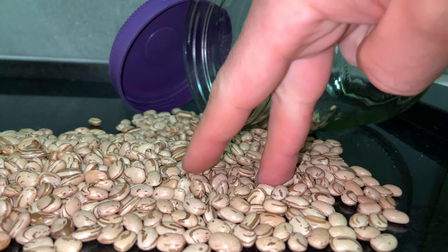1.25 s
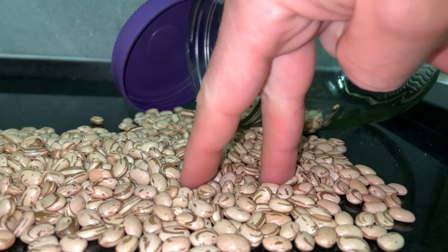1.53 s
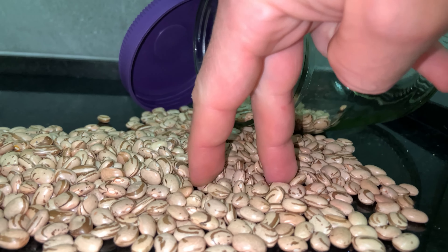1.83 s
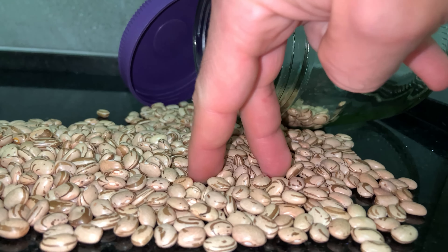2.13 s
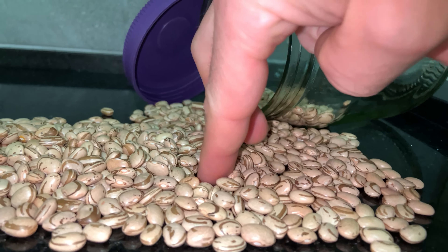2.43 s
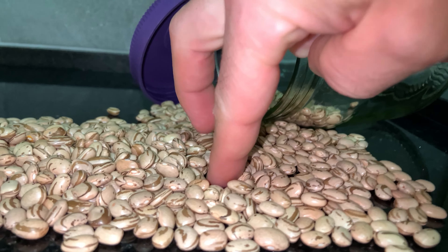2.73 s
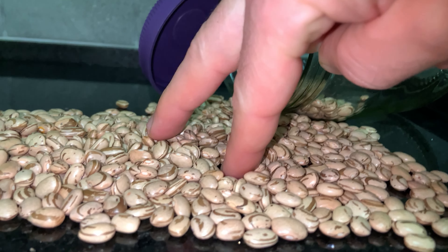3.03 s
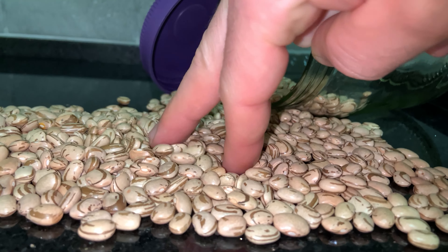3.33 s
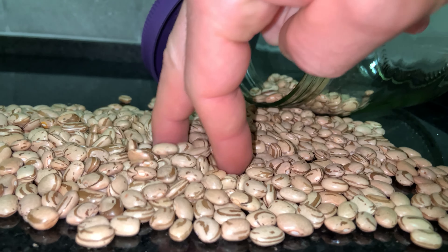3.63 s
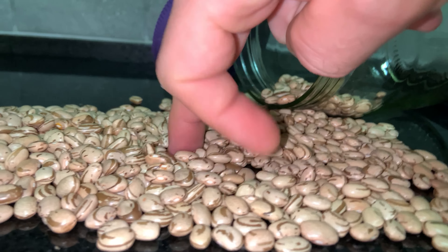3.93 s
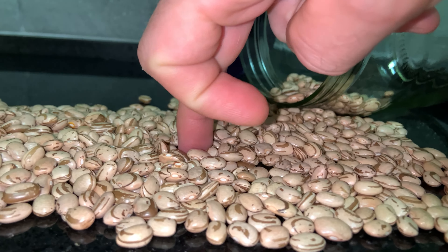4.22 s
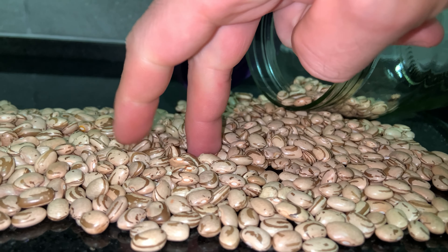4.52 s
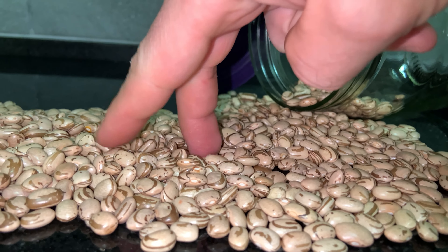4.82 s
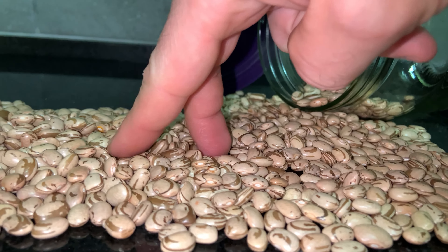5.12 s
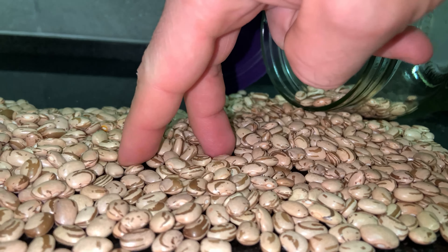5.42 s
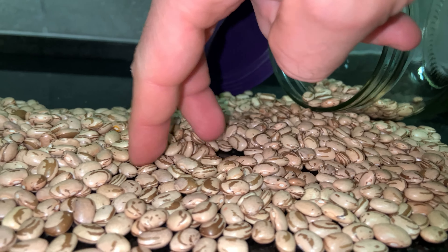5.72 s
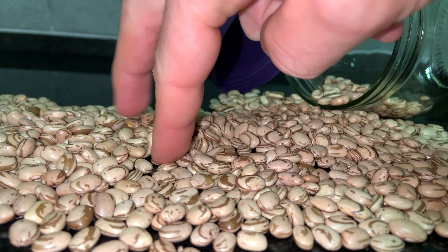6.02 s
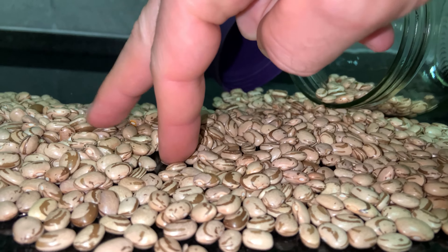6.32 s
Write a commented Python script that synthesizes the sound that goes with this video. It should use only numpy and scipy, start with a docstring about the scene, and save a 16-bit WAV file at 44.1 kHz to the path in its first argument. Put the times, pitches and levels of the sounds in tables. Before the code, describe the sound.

In a small room, an appliance hums quietly with a faint high whine. Close to a stereo microphone, dry beans click and shift as fingers press into a pile on a table. The crisp little bursts come with pauses between them and grow stronger, until a short rattling spill of beans makes the loudest moment. A few more ticks follow as the pile settles, each with a slight room echo.

```python
"""Dry beans tick and rustle as two fingers walk slowly through a heap of them on a hard table.
Their shells snap against each other, slide in small slips, and once tumble down the front of the heap.
They are close to a stereo microphone, and the small room adds a short echo.
Behind them an appliance hums and faintly whines over a low rumble and a soft hiss.
Faint hissy whistles and a few soft, low bumps come and go."""
import sys
import numpy as np
from scipy import signal
from scipy.fft import rfft, irfft
from scipy.io import wavfile
from scipy.ndimage import uniform_filter1d

SR = 44100
rng = np.random.default_rng(int(sys.argv[2]) if len(sys.argv) > 2 else 0)


def output_pcm(signal):
    """Save a mono or channel-first signal as 16-bit PCM at the path in sys.argv[1].

    Samples are clipped to [-1, 1] before scaling.
    """
    pcm = np.clip(np.atleast_2d(signal).T, -1, 1) * 32767
    wavfile.write(sys.argv[1], SR, np.round(pcm).astype(np.int16))


N = 284886

# How strong the room's rumble and the hiss are at each pitch: pitch_hz, density_db (power per Hz)
RUMBLE_COLOUR = [(15, -108), (30, -86), (55, -77), (100, -79), (130, -70), (160, -82.5), (210, -72),
                 (275, -83.5), (330, -78.5), (440, -86), (620, -90.5), (900, -96.5), (1400, -108),
                 (2500, -130)]
HISS_COLOUR = [(500, -120), (1900, -116), (2300, -116), (2700, -112), (3700, -117), (4700, -122),
               (6900, -120), (9500, -122), (13000, -120), (15600, -119), (16000, -138)]
# How alike left and right are: pitch_hz, likeness (0 to 1)
RUMBLE_LIKENESS = [(25, 0.9), (60, 0.6), (200, 0.93), (500, 1), (1000, 0.63), (2000, 0.4)]
HISS_LIKENESS = [(2000, 0.067), (7000, 0.1), (9300, 1), (13000, 0.62), (15000, 0.88)]
# How much sooner rumble and hum reach the right side: pitch_hz, lead_s
RIGHT_LEAD = [(50, 0.00052), (120, 0.001), (207, .0016), (400, 0.002), (720, 0.002134), (1000, 0.0025),
              (1500, 0.001678)]
# The appliance's motor and mains tones: pitch_hz, level_db
HUM_TONES = [(51.86, -59.3), (59.34, -66.3), (68.22, -67.4), (118.73, -59.5), (120.07, -53.2),
             (136.43, -67.9), (171.89, -60.4), (188.29, -62.3), (207.38, -52.8), (237.5, -74.4),
             (240.1, -68.1), (259.2, -66.6), (275.6, -73.9), (291.96, -75.3), (327.46, -65.6),
             (343.77, -71.7), (414.72, -76.0), (447.44, -76.7), (466.58, -81.5), (499.34, -80.1),
             (534.84, -79.1), (653.02, -74.9), (771.79, -82.9), (890.52, -80.8)]
# Its thin whines: start_s, end_s, pitch_hz, jitter_hz, level_db
WHINE_TONES = [(-.5, .5, 3985, 50, -85), (.3, 2.0, 3985, 60, -91), (1.8, 3.3, 3975, 55, -87.5),
               (1.85, 2.3, 3900, 160, -85), (3.1, 5.5, 3980, 38, -83), (3.3, 3.7, 3950, 150, -83),
               (5.3, 6.0, 3980, 45, -86.5), (5.85, 7, 3985, 55, -90), (3.9, 6.0, 3450, 50, -86.5),
               (-.5, 7, 5820, 75, -91), (.36, 1.55, 5820, 55, -81.5), (4.0, 4.9, 5800, 70, -88),
               (5.5, 7, 5800, 60, -90), (-.5, 1.7, 6420, 60, -91.5), (.7, 5.4, 7000, 70, -90.5),
               (5.2, 7, 7020, 65, -84.5), (-.5, 7, 2650, 80, -91.5), (-.5, 7, 2950, 80, -91),
               (1.7, 3.8, 2750, 420, -85.5)]
# Gliding whistles: start_s, length_s, first_hz, middle_hz, last_hz, width_hz, relative_level_db
WHISTLE_GLIDES = [(.11, .44, 5900, 4250, 6400, 800, -85), (.46, .06, 5100, 5250, 5400, 300, -82),
                  (.97, .12, 5300, 4800, 4400, 900, -92), (1.035, .03, 7100, 7300, 7300, 900, -85),
                  (1.88, .68, 4000, 3950, 5900, 1000, -83.5), (2.42, .12, 5200, 5250, 5350, 500, -83),
                  (2.83, .09, 5500, 5700, 6000, 1000, -89), (3.3, .5, 3900, 3950, 5500, 900, -82),
                  (3.75, .05, 5300, 5350, 5500, 450, -74)]
# Patches of beans giving way under a finger, crisp on top of the heap and muffled deep inside:
# start_s, moving_s, relative_level_db, crispness_db
BEAN_SLIPS = [(.29, .028, -75, 1), (.335, 0.03, -66, -6), (.6, 0.02, -80, 5), (.86, 0.044, -77, 4),
              (1.35, 0.036, -66, -7), (1.395, 0.056, -60, 0), (1.534, 0.0034, -74, 13),
              (1.795, 0.027, -68.5, 2), (2.028, 0.016, -58, -8), (2.05, 0.014, -54, -3),
              (2.258, 0.027, -68, -9), (2.293, 0.18, -58, -3), (3.27, 0.045, -57, -6),
              (3.33, 0.029, -54, -5), (3.39, .05, -65, -18), (3.437, 0.0026, -53, -4),
              (3.558, .035, -65, -6), (3.597, 0.034, -52, -5), (3.631, 0.051, -43, -1),
              (3.75, 0.029, -56, -1), (3.8, 0.21, -62, -1.5), (3.893, 0.062, -62, 15),
              (4.295, 0.025, -84.5, 12), (4.983, 0.015, -57, -1), (5.159, .015, -55, -22),
              (5.184, 0.005, -35, 3.5), (5.21, 0.11, -41.5, 5.5), (5.35, 0.063, -57.5, 8),
              (5.587, 0.0061, -63.5, -7), (5.658, 0.035, -57.5, -17), (5.769, 0.026, -54.5, -13),
              (5.841, 0.0026, -55, 15.5), (5.86, 0.032, -55, -3)]
# The clear knocks of bean on bean: start_s, relative_level_db, relative_brightness_db
BEAN_KNOCKS = [(.2895, -64, 8), (.2965, -63, 12), (.3125, -60, 10), (.3185, -55, 9), (.357, -59, 6),
               (.606, -64, 14), (.616, -64, 14), (.8647, -58, 12), (1.388, -46, -18), (1.3986, -35, 12),
               (1.4191, -45, 2), (1.5223, -57, -11), (1.5357, -39, 8), (1.7932, -40, 8), (1.8129, -56, -2),
               (1.9449, -55, -12), (2.0356, -46, -12), (2.0504, -36, 14), (2.063, -48, 6),
               (2.2892, -34, 14), (2.3027, -44, 6), (2.3068, -41, 6), (2.3164, -34, 9), (2.3264, -49, 6),
               (2.3399, -49, 6), (2.3457, -48, 5), (2.3652, -50, 5), (2.3865, -34, 10), (2.4078, -30, 13),
               (2.4299, -39, 11), (2.4489, -43, 8), (2.4589, -49, 7), (2.4714, -49, 7), (2.4801, -53, 5),
               (3.2797, -51, -9), (3.2936, -49, -6), (3.2982, -51, -8), (3.3217, -42, 1), (3.3245, -38, -4),
               (3.3365, -40, -2), (3.3439, -44, -9), (3.3497, -39, -12), (3.366, -42, -2), (3.4393, -44, 5),
               (3.4469, -50, 0), (3.5653, -58, -14), (3.5949, -47, 2), (3.6, -45, 5), (3.6123, -48, 2),
               (3.6248, -42, -7), (3.6311, -27, 3), (3.6451, -28, -2), (3.6525, -30, -2), (3.6656, -29, -6),
               (3.6828, -39, -3), (3.6869, -39, -3), (3.6995, -36, -6), (3.7125, -46, -5),
               (3.7161, -47, -2), (3.7461, -49, -7), (3.7561, -49, -1), (3.7664, -49, -2), (3.7783, -46, 1),
               (3.7978, -48, -5), (3.8555, -52, -3), (3.8751, -37, 6), (3.8898, -39, 13), (3.8924, -42, 8),
               (3.8947, -46, -6), (3.9013, -45, 2), (3.9114, -23, 6), (3.9217, -45, 3), (3.924, -44, -6),
               (3.9341, -30, 2), (3.9398, -40, -3), (3.9449, -42, 4), (3.9493, -40, 1), (3.9534, -41, 0),
               (3.9844, -55, 12), (4.0017, -45, 13), (4.298, -65, 14), (4.9759, -35, 6), (4.9896, -42, 2),
               (5.0018, -52, -2), (5.1578, -49, 3), (5.1618, -45, 4), (5.1788, -32, 3), (5.1822, -14, 6),
               (5.1936, -24, 3), (5.1995, -28, 2), (5.2008, -31, -2), (5.2225, -30, 6), (5.2256, -28, 6),
               (5.2408, -21, 9), (5.2477, -29, 5), (5.2492, -29, 7), (5.2531, -28, 5), (5.2576, -32, -3),
               (5.2614, -28, 4), (5.2649, -33, 2), (5.2738, -28, 2), (5.2835, -30, 0), (5.2918, -25, 8),
               (5.2937, -24, 4), (5.3037, -28, 8), (5.315, -32, 6), (5.318, -27, 9), (5.3301, -37, 4),
               (5.3354, -38, 4), (5.3392, -38, 4), (5.3483, -42, 4), (5.352, -39, 4), (5.3559, -41, 4),
               (5.3684, -43, 8), (5.3814, -29, 2), (5.4047, -27, 5), (5.4118, -42, -3), (5.4237, -38, 3),
               (5.4339, -45, -4), (5.443, -49, -8), (5.7753, -52, 9), (5.7856, -43, 1), (5.7953, -43, 6),
               (5.8397, -24, 11), (5.8571, -36, 4), (5.879, -46, 2), (5.8952, -45, 0)]
# Tone colours of sliding, of a knock, and of its dull tock in the table: pitch_hz, relative_level_db
SLIDE_COLOUR = [(300, -38), (900, -16.5), (1600, -11.5), (2100, -10.5), (2800, -16), (4000, -1), (5000, -3),
                (6200, -2), (7600, 0), (9000, 1.5), (11000, 1.5), (13500, 4.5), (15200, 0), (15900, -22),
                (16500, -31)]
KNOCK_COLOUR = [(300, -36), (1200, -39), (2500, -22.5), (4000, -25.5), (5000, -26), (6300, -10), (7400, -5),
                (9200, 0.5), (11000, 1.5), (13000, 1), (15300, 4), (15900, -3), (16500, -14)]
TOCK_COLOUR = [(300, -15), (850, 5.5), (1300, -7.5), (2200, -0.5), (2900, 2), (4000, -3), (6000, -7),
               (16000, -38)]
# The ways one bean and the packed heap can ring: lowest_hz, highest_hz, decay_s, relative_strength
BEAN_RINGS = [(5700, 8800, .0015, .8), (10500, 15500, .0009, .7)]
HEAP_RINGS = [(1100, 2400, .005, .5), (3800, 6000, .005, 1.0)]
# How long the room's echo takes to fall by 60 dB: pitch_hz, fade_s
ROOM_FADE = [(500, 0.41), (3000, 0.7), (8000, 0.036), (16000, 0.039)]
# Soft low bumps: start_s, level_db, pitch_hz
LOW_BUMPS = [(0.741, -48.5, 168), (.77, -65, 84), (1.049, -47, 167), (1.576, -58, 148), (4.223, -55.5, 274),
             (6.299, -52.5, 254), (6.331, -50, 56.6)]

BEAN_LEAD_S, WHINE_LEAD_S = .000153, -.00048  # above zero: heard on the left first


def gain_of(db):
    """Turns decibels into a number to multiply by."""
    return 10 ** (np.asarray(db) / 20)


def evened(x):
    """Scales a sound to an average (rms) level of 1."""
    return x / np.sqrt(np.mean(x ** 2) + 1e-20)


def look_up(table, hz):
    """Reads a table at any pitch by blending the nearest rows."""
    pitches, values = np.transpose(table)
    return np.interp(np.log(hz + 1), np.log(pitches + 1), values)


def add(mix, start_s, sound):
    """Mixes a sound in at its start time."""
    part = mix[max(round(start_s * SR), 0):][:len(sound)]
    part += sound[:len(part)]


def below(x, hz):
    """Keeps the part of a sound lower than hz."""
    return signal.sosfiltfilt(signal.butter(4, hz, fs=SR, output="sos"), x)


def stereo(x, lead_s):
    """Sends one sound to both sides, the left one earlier by lead_s."""
    hz = np.fft.rfftfreq(N, 1 / SR)
    return irfft(rfft(x) * np.exp(1j * np.pi * hz * lead_s * np.array([[1], [-1]])), N)


def steady_noise(colour, likeness, left_lead_s):
    """Rumble or hiss: even noise that left and right partly share."""
    hz = np.fft.rfftfreq(N, 1 / SR)
    left, other = rfft(rng.standard_normal((2, N)))
    same = np.clip(look_up(likeness, hz), 0, 1)
    right = same * left + np.sqrt(1 - same ** 2) * other
    right *= np.exp(-2j * np.pi * hz * left_lead_s(hz))
    return irfft(np.array([left, right]) * gain_of(look_up(colour, hz)), N) * np.sqrt(SR / 2)


def hum(in_step_s=.06, waver=.051):
    """Motor and mains tones waver slightly; those close in pitch throb against each other."""
    t, out = np.arange(N) / SR, np.zeros((2, N))
    for hz, db in HUM_TONES:
        drift = np.interp(t, np.linspace(0, t[-1], 20), rng.standard_normal(20))
        scatter = rng.uniform(0, 2 * np.pi) * (hz > 130)  # the room puts higher tones out of step
        lag_s = look_up(RIGHT_LEAD, hz) * np.array([[.5], [-.5]])
        phase = 2 * np.pi * hz * (t - in_step_s - lag_s) + scatter + waver * drift
        out += gain_of(db) * np.sqrt(2) * np.cos(phase)
    return out


def whines(fade_s=.17):
    """The appliance's faint high tones, made fuzzy by a fast shake in pitch."""
    t, out = np.arange(N) / SR, np.zeros(N)
    for start_s, end_s, hz, jitter_hz, db in WHINE_TONES:
        pitch_hz = hz + jitter_hz * evened(uniform_filter1d(rng.standard_normal(N), size=120))
        waver_db = .9 * np.interp(t, np.linspace(0, t[-1], 50), rng.standard_normal(50))
        fade = np.clip(np.minimum(t - start_s, end_s - t) / fade_s, 0, 1)
        out += gain_of(db + waver_db) * np.sqrt(2 * fade) * np.sin(2 * np.pi * np.cumsum(pitch_hz) / SR)
    return out


def whistles(swell_db=4):
    """Narrow bands of hiss glide through three pitches, swelling a little on the way."""
    out = np.zeros(N)
    for start_s, length_s, first_hz, middle_hz, last_hz, width_hz, db in WHISTLE_GLIDES:
        progress = np.linspace(0, 1, round(length_s * SR))
        hz = np.polyval(np.polyfit([0, .5, 1], [first_hz, middle_hz, last_hz], 2), progress)
        tone = np.exp(2j * np.pi * np.cumsum(hz) / SR)
        feedback = np.exp(-np.pi * width_hz / SR)
        noise = rng.standard_normal(N)[:len(hz)]
        # Shift the noise down, keep a narrow band, and shift it back up to the gliding pitch.
        band = tone * signal.lfilter([1], np.poly([feedback, feedback]), noise / tone)
        swell = np.sqrt(abs(np.sin(np.pi * progress))) * gain_of(swell_db * progress)
        add(out, start_s, gain_of(db) * swell * evened(band.real))
    return out


def coloured_click(colour, tilt_db=0, size=512):
    """One click with the given tone colour; tilt_db brightens it per octave above 7000 Hz."""
    hz = abs(np.fft.fftfreq(size, 1 / SR))
    octaves = np.log2(np.maximum(hz, 7000) / 10000)
    log_gain = np.log(gain_of(look_up(colour, hz) + tilt_db * octaves))
    click = np.fft.ifft(np.exp(np.conj(signal.hilbert(log_gain)))).real  # packs the sound at the start
    return click / np.linalg.norm(click)


def contact(colour, tilt_db, rings, ringing, chatter=1.3, chatter_s=.0004, size=640):
    """Two hard shells meet: a snap, a split second of chatter and a short ring, new every time."""
    t = np.arange(size) / SR
    force = rng.standard_normal(size) * np.exp(-t / chatter_s)
    force *= chatter / np.linalg.norm(force)
    force[0] += 1  # the first snap
    force = evened(force)
    for low_hz, high_hz, decay_s, strength in rings:
        ring = np.exp(-t / decay_s) * np.sin(2 * np.pi * rng.uniform(low_hz, high_hz) * t)
        force += ringing * strength * evened(ring)
    sound = signal.fftconvolve(force, coloured_click(colour, tilt_db))
    return sound / np.linalg.norm(sound)


def slipping(creep_db=-11.5, creep_db_per_s=608, break_db_per_s=2996,
             sag_db_per_s=31.5, settle_db_per_s=378):
    """Slips creep, break loose, weaken and settle. Gives their joint level and crispness over time."""
    t, power, crispness = np.arange(N) / SR, np.full(N, 1e-12), np.zeros(N)
    for start_s, length_s, db, crisp_db in BEAN_SLIPS:
        before_s = np.maximum(start_s - t, 0)
        moving_s = np.clip(t - start_s, 0, length_s)
        after_s = np.maximum(t - start_s - length_s, 0)
        rise_db = np.maximum(-break_db_per_s * before_s, creep_db - creep_db_per_s * before_s)
        fall_db = sag_db_per_s * moving_s + settle_db_per_s * after_s
        slip_power = gain_of(np.maximum(db + rise_db - fall_db, -200)) ** 2
        power += slip_power
        crispness += slip_power * crisp_db
    return 10 * np.log10(power), crispness / power


def sliding(slip_db, crisp_db, level_db=-5, rub_db=-5, tilt_spread_db=6.5, bean_count=24):
    """Sliding beans rub their skins and make tiny ticks, more of them as the slip grows."""
    ticks_per_s = 900 * gain_of(.21 * (slip_db + 50))
    strength = evened(gain_of(-.5 * np.minimum(rng.exponential(1, N), 3.5)))
    hits = strength * (rng.random(N) < ticks_per_s / SR) * np.sqrt(SR / ticks_per_s)
    which_bean, ticks = rng.integers(0, bean_count, N), np.zeros(N)
    for bean in range(bean_count):
        tilt_db = tilt_spread_db * rng.standard_normal()
        tick = contact(SLIDE_COLOUR, tilt_db, BEAN_RINGS, ringing=.6, chatter=.4, chatter_s=.0009)
        ticks += signal.oaconvolve(hits * (which_bean == bean), tick)[:N]
    rub = signal.oaconvolve(rng.standard_normal(N), coloured_click(SLIDE_COLOUR))[:N]
    rustle = (ticks + gain_of(rub_db) * rub) * gain_of(slip_db + level_db)
    body = below(rustle, 7360)
    return body + (rustle - body) * gain_of(crisp_db)


def knock(db, tilt_db, ringing, tock_db=-24.5, tock_growth=.75):
    """Bean hits bean: a bright snap, and a dull tock as the blow goes through the heap into the table."""
    snap = contact(KNOCK_COLOUR, tilt_db, BEAN_RINGS, ringing)
    tock = contact(TOCK_COLOUR, 0, HEAP_RINGS, ringing=.57)
    return gain_of(db) * snap + gain_of(tock_db + tock_growth * db) * tock


def jostling(slip_db, crisp_db, per_s=70, boost_db=17.5, spread_db=2.5, tilt_spread_db=14.5, count=700):
    """Smaller knocks at random moments follow the strength and crispness of the slips."""
    out = np.zeros(N)
    starts_s = np.cumsum(rng.uniform(.3, 1.7, count)) / per_s
    for start_s, (strength, tilt) in zip(starts_s, rng.standard_normal((count, 2))):
        at = round(start_s * SR)
        if at < N:
            db = slip_db[at] + boost_db + spread_db * strength
            add(out, start_s, knock(db, crisp_db[at] + tilt_spread_db * tilt, ringing=.7))
    return out


def clear_knocks(boost_db=11.5):
    """The ticks that stand out when beans snap past a neighbour or drop."""
    out = np.zeros(N)
    for start_s, db, bright_db in BEAN_KNOCKS:
        add(out, start_s, knock(db + boost_db, tilt_db=1.3 * bright_db - 3.5, ringing=.4))
    return out


def near_echoes(x, decay_s, change_s=.009, size=1200, count=4):
    """Quick echoes off nearby surfaces. Pairs of patterns take turns, as beans sound in other spots."""
    t, turn, out = np.arange(size) / SR, np.arange(N) / SR / change_s, np.zeros((2, N))
    for k in range(count):
        share = np.sqrt(np.maximum(1 - abs((turn - k) % count - 1), 0))
        echoes = rng.standard_normal((2, size)) * np.exp(-t / decay_s) * (t > .0005)
        echoes /= np.linalg.norm(echoes, axis=1, keepdims=True)
        out += signal.oaconvolve((x * share)[None], echoes, axes=1)[:, :N]
    return out


def room_echo(x, rise_s=.0018, size=20000):
    """The room answers with two unrelated tails in which each pitch fades at its own speed."""
    hz, t, bands = signal.stft(rng.standard_normal((2, size)), SR, nperseg=256)
    fade = gain_of(-60 * t / look_up(ROOM_FADE, hz)[:, None])
    tail = signal.istft(bands * fade, SR, nperseg=256)[1]
    tail *= np.clip(np.arange(tail.shape[1]) / SR / rise_s, 0, 1)
    return signal.fftconvolve(x[None], tail / np.linalg.norm(tail[0]), axes=1)[:, :N]


def beans(near_db=-11.5, high_room_db=-15, low_room_db=-8.5, low_direct_db=-6.5, width=.46):
    """High sound comes straight from the beans; lower sound mostly spreads from the whole table top."""
    slip_db, crisp_db = slipping()
    sound = clear_knocks() + jostling(slip_db, crisp_db) + sliding(slip_db, crisp_db)
    low = below(sound, 5600)
    high = sound - low
    off_heap_and_hand = gain_of(near_db) * near_echoes(high, decay_s=.0021)
    middle, side = off_heap_and_hand + gain_of(high_room_db) * room_echo(high)
    table = near_echoes(low, decay_s=.01) + gain_of(low_room_db) * room_echo(low)
    direct = high + gain_of(low_direct_db) * low
    wide = width * stereo(side, BEAN_LEAD_S) * np.array([[1], [-1]])  # sets left and right apart
    return stereo(direct + middle, BEAN_LEAD_S) + wide + table


def bumps(rise_s=.0038, size=6000):
    """Dull, low thuds that die away almost at once."""
    t, out = np.arange(size) / SR, np.zeros(N)
    swell = t / rise_s * np.exp(1 - t / rise_s)
    for start_s, db, hz in LOW_BUMPS:
        add(out, start_s, gain_of(db) * np.sqrt(2) * swell * np.sin(2 * np.pi * hz * t))
    return out


def scene():
    """The beans in front of the quiet sounds of the room."""
    rumble = steady_noise(RUMBLE_COLOUR, RUMBLE_LIKENESS, lambda hz: -look_up(RIGHT_LEAD, hz))
    hiss = steady_noise(HISS_COLOUR, HISS_LIKENESS, lambda hz: BEAN_LEAD_S)
    return beans() + rumble + hiss + hum() + stereo(whines(), WHINE_LEAD_S) + whistles() + bumps()


def record(dry):
    """Cuts away the very highest sound, above 16500 Hz."""
    treble_cut = signal.firwin(401, 16500, window=("kaiser", 9), fs=SR)
    return signal.oaconvolve(dry, treble_cut[None], "same")


dry = scene()
out = record(dry)
output_pcm(out)
```